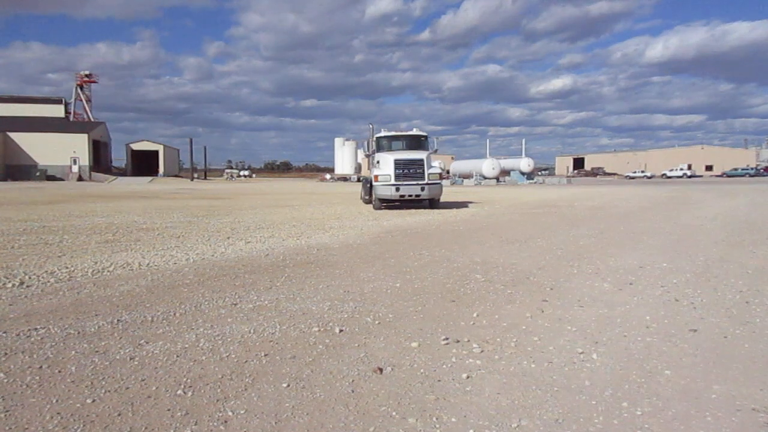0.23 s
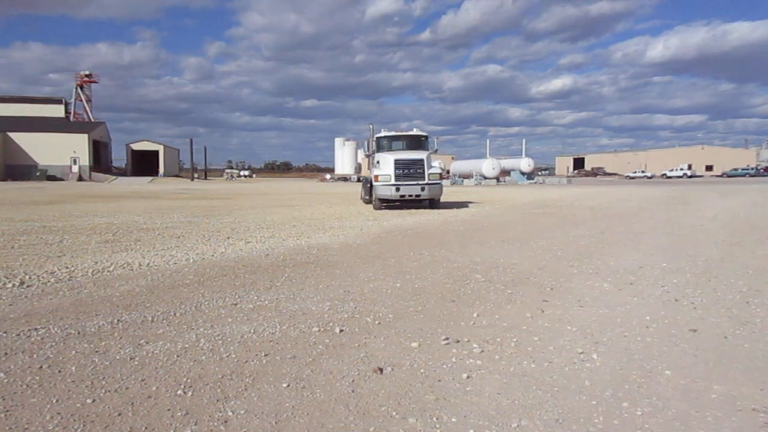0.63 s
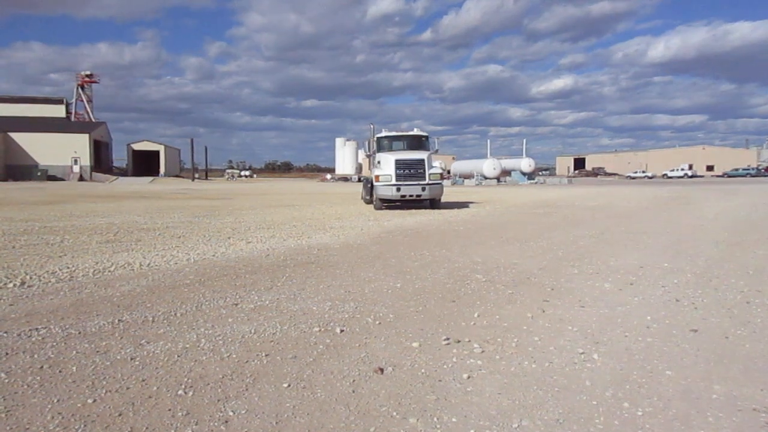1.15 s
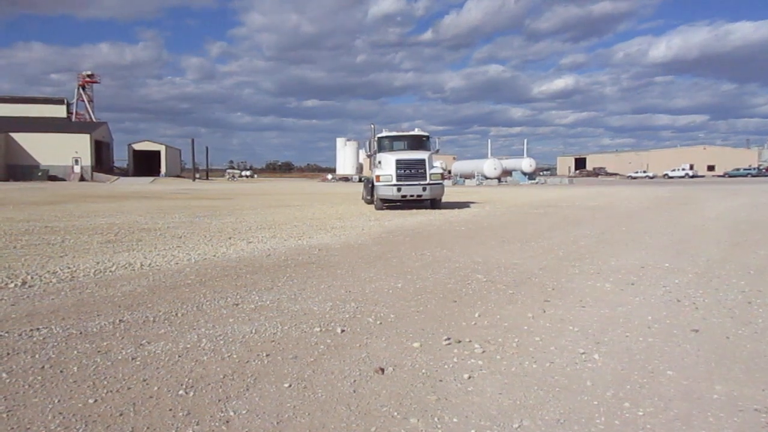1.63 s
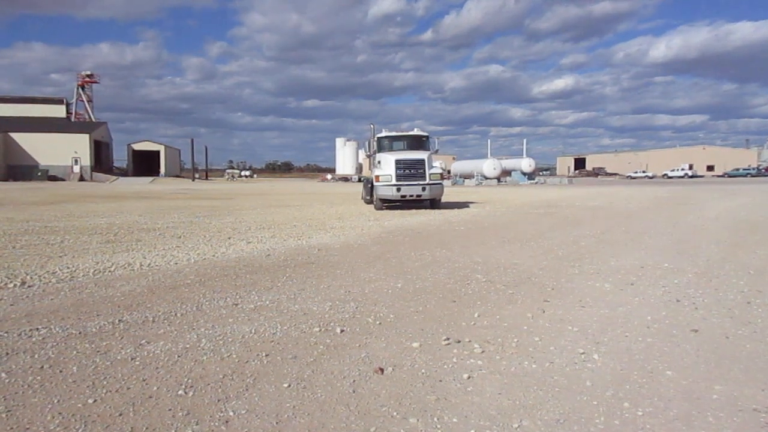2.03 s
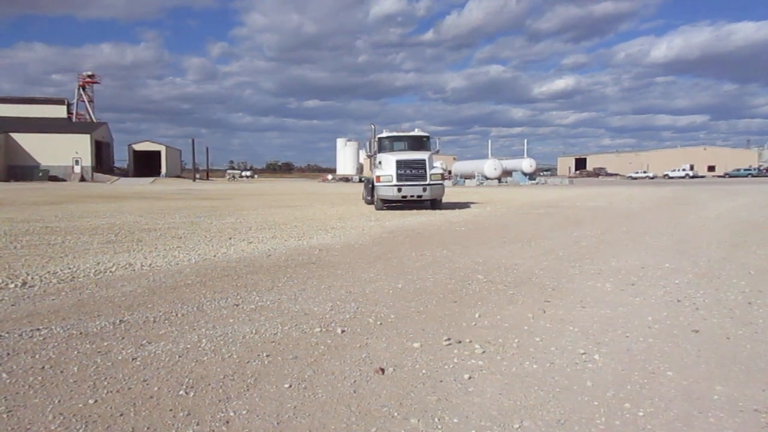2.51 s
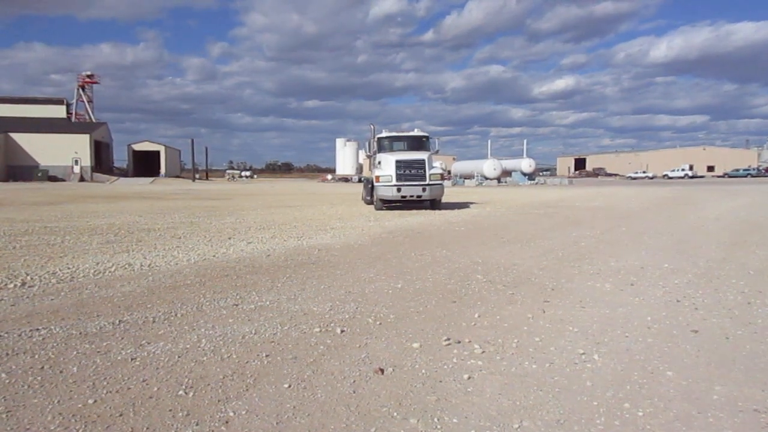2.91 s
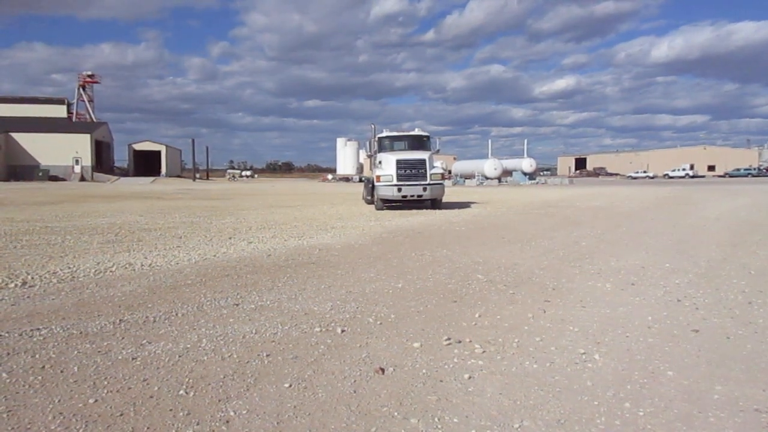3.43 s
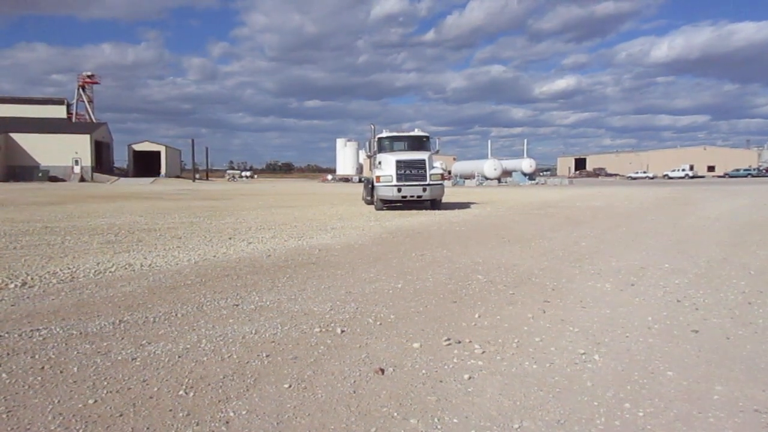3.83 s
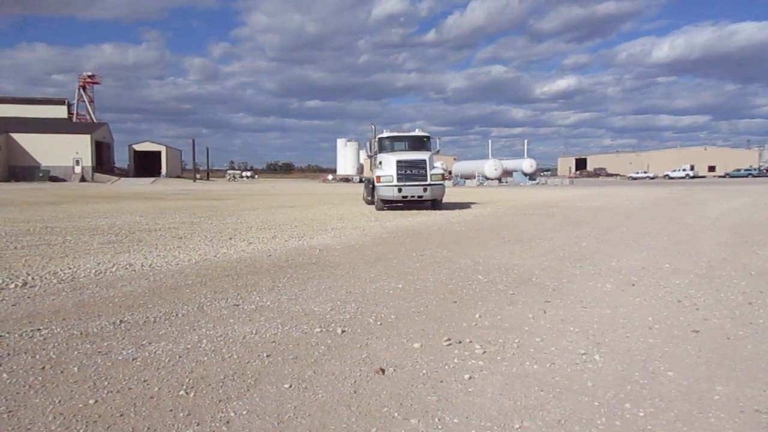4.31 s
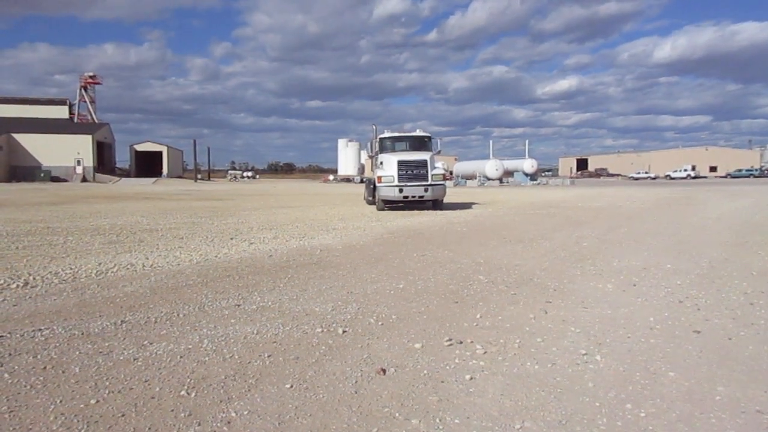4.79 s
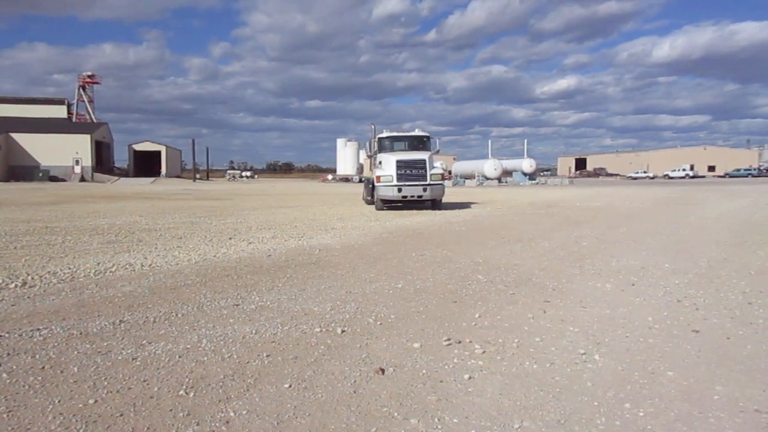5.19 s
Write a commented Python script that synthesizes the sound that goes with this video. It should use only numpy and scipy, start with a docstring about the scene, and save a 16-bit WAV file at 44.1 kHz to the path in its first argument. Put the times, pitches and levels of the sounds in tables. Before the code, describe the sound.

Wind hits a bare camera microphone in a wide, open gravel yard, with no echo. It begins abruptly at full strength: a deep, lumpy rumble, mostly low bass, covered in rapid crackles and flutter until about 0.4 s. Hard pops follow near 0.55 and 0.7 s, then another rough, crackling gust from 1.15 to 1.4 s. The wind eases around 1.5 s, flutters on, and gives a very sharp snap at 2.14 s. Shorter bursts come at 2.4 and 2.75 s, with a relative lull until 3 s. Softer thumps and flaps continue through 3.3 to 4.2 s, with another bright snap at 4.25 s. After that the crackles thin out while rumble keeps rolling, surging near 5.1 and from 5.25 to 5.4 s. The biggest swings are softly overloaded. Far below, a parked diesel truck idles evenly, a faint hiss with quick treble clatter, noticeable mainly in the lulls.

```python
"""Wind rumbles and crackles throughout: it gusts over a bare camera microphone in a wide open yard.
Big eddies are shaped noise; small ones are vortex pulses that flutter, flick the membrane and snap.
The strongest swings overload the amplifier, a soft squeeze against full scale.
Far beneath, a parked truck idles: faint noise whose treble clatters with each firing."""
import sys
import numpy as np
from scipy.fft import rfft, irfft, next_fast_len
from scipy.io import wavfile
from scipy.ndimage import uniform_filter1d, map_coordinates

SR = 44100
rng = np.random.default_rng(int(sys.argv[2]) if len(sys.argv) > 2 else 0)


def digitize_waveform(pressure):
    """Quantize a signal to 16-bit integers and store it at the path in sys.argv[1].

    Rows of a 2-D input are taken as channels; values are limited to [-1, 1].
    """
    field = np.atleast_2d(pressure).T
    bounded = np.clip(field, -1, 1)
    quanta = np.round(bounded * 32767).astype(np.int16)
    wavfile.write(sys.argv[1], SR, quanta)


N = 240515

# Gust strength, before each layer's own offsets: [t/s, rumble level/dB, small-eddy flutter level/dB]
GUSTS = [(0.0, -13.5, -25), (0.03, -23, -26.5), (0.17, -21, -33.5), (0.23, -13, -28), (0.33, -20.5, -29.5),
         (0.51, -23, -38.5), (0.55, -19.5, -36), (0.61, -17, -33.5), (0.64, -31, -41), (0.68, -20, -54),
         (0.82, -22.5, -37.5), (0.97, -31, -45.5), (1.02, -17.5, -38), (1.06, -28.5, -38.5),
         (1.18, -16, -28), (1.21, -15.5, -28.5), (1.38, -25, -46), (1.61, -24, -38), (1.64, -25, -30.5),
         (1.76, -24, -44.5), (1.81, -18, -36), (1.88, -30, -43), (1.99, -19, -34), (2.02, -20, -32.5),
         (2.15, -18, -35), (2.17, -21.5, -35), (2.37, -27, -41.5), (2.43, -23, -43), (2.52, -31, -43),
         (2.56, -19.5, -42.5), (2.66, -26, -33.5), (2.69, -23.5, -35.5), (2.99, -23.5, -41),
         (3.08, -19.5, -31), (3.34, -23, -38), (3.41, -17, -32.5), (3.54, -23, -36), (3.6, -18.5, -31.5),
         (3.67, -21, -36), (3.84, -17.5, -28.5), (3.95, -27, -34), (4.01, -17.5, -36), (4.17, -18.5, -28.5),
         (4.28, -20, -33.5), (4.31, -23, -44.5), (4.43, -26, -39), (4.52, -23, -33), (4.55, -37, -33),
         (4.6, -21, -37), (4.86, -23, -36), (4.89, -19.5, -34.5), (4.98, -23.5, -38.5), (5.07, -15.5, -47),
         (5.11, -24.5, -37), (5.19, -23, -41), (5.22, -28.5, -40), (5.25, -14, -39), (5.28, -32, -39),
         (5.36, -14.5, -35), (5.45, -28.5, -43.5)]
# Vortex knots that flick the membrane:
# [t/s, level/dB, nominal passing time/ms, length/ms, thump of the parent eddy relative to the flick/dB]
FLICKS = [(0.0183, -19.5, 0.23, 3.5, -1), (0.0233, -31, 0.38, 4, 11), (0.03, -18.5, 0.45, 3, -6),
          (0.0378, -17.5, 0.4, 3.4, -6), (0.0462, -31, 0.56, 2.8, -3), (0.053, -19.5, 0.33, 2.7, 1.5),
          (0.0605, -25.5, 0.5, 2.3, 8), (0.0615, -18.5, 0.6, 2.8, 1), (0.0666, -22.5, 0.35, 2.5, 5),
          (0.077, -36, 0.5, 2.8, 3), (0.0835, -22.5, 0.46, 4.4, 1), (0.096, -31, 0.33, 2.7, -4),
          (0.101, -27.5, 0.4, 3.6, 11), (0.112, -31, 0.37, 3.8, 9), (0.1345, -31, 0.54, 3.4, 1.5),
          (0.1542, -24, 0.34, 4.1, 6.5), (0.204, -14, 0.32, 2.3, 0.5), (0.2253, -16, 0.43, 2.1, -8),
          (0.231, -12, 0.23, 2.6, -3), (0.239, -33.5, 0.35, 4.5, 0), (0.2487, -21.5, 0.27, 5.9, 0),
          (0.2543, -19, 0.26, 4, 6), (0.2641, -18.5, 0.23, 1.5, 0.5), (0.2675, -20.5, 0.19, 2.6, 7),
          (0.277, -26, 0.38, 4.2, 3), (0.2898, -26, 0.26, 2.9, 3), (0.3337, -25.5, 0.47, 3.4, 10.5),
          (0.339, -27.5, 0.32, 4, 9), (0.3501, -20, 0.31, 2, 3), (0.3652, -27, 0.33, 3.3, 7),
          (0.377, -34.5, 0.3, 2, 2), (0.4027, -18.5, 0.33, 7.8, -8), (0.5536, -8, 0.33, 3.63, -4),
          (0.5691, -21.5, 0.27, 3.2, -2), (0.5987, -18.5, 0.35, 5.1, 6), (0.6195, -19.5, 0.31, 3.5, -2),
          (0.6682, -23.5, 0.56, 3.9, 5.5), (0.6969, -13, 0.27, 2.37, -1.5), (0.707, -29, 0.45, 3, 2),
          (0.7146, -23.5, 0.52, 5.2, -14), (0.7318, -24, 0.24, 5.2, -3), (0.7379, -19, 0.47, 2.4, 2.5),
          (0.7649, -21.5, 0.39, 4.5, -5), (0.781, -31, 0.47, 2.6, -4), (0.8101, -22.5, 0.32, 2.3, 2),
          (0.8259, -21, 0.17, 3.13, 3.5), (0.8506, -33, 0.24, 2, 10), (1.001, -36, 0.53, 7.2, 1),
          (1.013, -23.5, 0.33, 2.4, 11), (1.019, -23.5, 0.33, 4.1, 5.5), (1.038, -31.5, 0.62, 5.3, 10),
          (1.065, -30, 0.42, 2.6, 8), (1.075, -26, 0.45, 2.9, -3), (1.0806, -22, 0.29, 4.7, -9.5),
          (1.0881, -25, 0.28, 5.2, 3), (1.104, -20.5, 0.34, 3.2, 1), (1.137, -28.5, 0.38, 2.3, 10),
          (1.1581, -14.5, 0.27, 3.6, 0), (1.182, -26, 0.18, 3.3, 15), (1.2517, -13, 0.26, 3.3, -13),
          (1.259, -13, 0.24, 3.3, 0.5), (1.2677, -16, 0.41, 3.1, 0), (1.2774, -19.5, 0.2, 2.9, 8.5),
          (1.2849, -11, 0.19, 2.32, -20), (1.2926, -19.5, 0.3, 2.7, -1), (1.2966, -30, 0.3, 6.4, 8),
          (1.3029, -25, 0.26, 4, -1), (1.3228, -23.5, 0.3, 1.7, 9.5), (1.361, -34, 0.3, 4.3, 2),
          (1.374, -32, 0.42, 5, 8.5), (1.396, -22, 0.39, 3.75, 5), (1.4989, -28, 0.54, 3, 2.5),
          (1.6445, -29, 0.56, 3.4, 9.5), (1.661, -28.5, 0.41, 2.6, -1), (1.672, -24, 0.45, 3.7, 0),
          (1.7289, -21.5, 0.34, 3.3, 1.5), (1.7999, -14.5, 0.24, 3.2, 1), (1.8266, -23.5, 0.51, 3.4, -9),
          (1.832, -23, 0.48, 2.8, 3), (1.849, -30, 0.4, 3.6, -1), (1.854, -27.5, 0.47, 2.7, 5),
          (1.876, -31, 0.46, 4.9, 3), (1.914, -35, 0.58, 5.5, 20), (1.9264, -35, 0.5, 6.9, 1),
          (1.966, -31, 0.52, 6.3, 10), (1.9764, -20, 0.37, 3, 8.5), (1.9809, -28, 0.37, 2.7, 2),
          (1.985, -21.5, 0.32, 3.9, 0), (1.9962, -31.5, 0.43, 2.4, 8), (2.017, -32.5, 0.55, 5.3, -1),
          (2.0628, -35, 0.29, 3.7, 18), (2.069, -33.5, 0.41, 3.1, 14.5), (2.0914, -16, 0.23, 2.6, 4.5),
          (2.099, -24.5, 0.26, 2.4, 9), (2.1183, -33, 0.39, 2, 0), (2.1406, -17.5, 0.3, 1.1, 11),
          (2.1434, -7.5, 0.11, 1.2, 4.5), (2.1602, -33, 0.28, 3.7, 1), (2.175, -36, 0.45, 3.4, 1),
          (2.1802, -27.5, 0.57, 2.1, -11), (2.195, -23.5, 0.42, 1.8, 4), (2.1985, -31, 0.29, 2.2, 10),
          (2.2116, -28.5, 0.41, 2.7, 9), (2.2339, -30.5, 0.65, 5, 10.5), (2.292, -32.5, 0.44, 2.5, 0.5),
          (2.3794, -29.5, 0.31, 4.2, -3.5), (2.3884, -35, 0.46, 2, -1), (2.3974, -25, 0.42, 4.1, 5),
          (2.4119, -21.5, 0.29, 3.1, 2), (2.4226, -23, 0.33, 2.9, -6), (2.4262, -27.5, 0.46, 8.2, -6),
          (2.4345, -25, 0.38, 4, -1), (2.5609, -26, 0.51, 4.2, 5), (2.5677, -22.5, 0.34, 3.35, 3.5),
          (2.5819, -25, 0.52, 3.0, -2), (2.592, -36.5, 0.2, 2.0, 2), (2.6889, -32.5, 0.38, 4.4, 13.5),
          (2.7209, -23, 0.26, 4.4, 11.5), (2.73, -14.5, 0.32, 5, -7), (2.7413, -16, 0.19, 3.7, -18),
          (2.7461, -13.5, 0.2, 3.4, -0.5), (2.756, -24, 0.3, 8, 6), (2.765, -29, 0.62, 2.9, -4.5),
          (3.0077, -22, 0.32, 4.16, 1), (3.0182, -24, 0.31, 2.44, -2), (3.0874, -28, 0.26, 4.7, 1),
          (3.1094, -28, 0.57, 3, -5), (3.122, -33, 0.49, 6.6, 5), (3.1576, -28, 0.83, 4, 12),
          (3.1658, -33.5, 0.29, 2.9, 0), (3.2874, -22, 0.34, 4.2, 1), (3.2934, -16.5, 0.23, 2.96, -4.5),
          (3.409, -26, 0.42, 3.3, 7), (3.4176, -17, 0.3, 2.2, 2.5), (3.435, -37, 0.26, 5.7, 4.5),
          (3.4506, -33, 0.36, 3.8, 8), (3.5828, -36, 0.44, 2.8, 0.5), (3.6162, -38, 0.37, 2.5, 8),
          (3.6337, -42, 0.42, 2.6, 13), (3.6611, -32.5, 0.54, 4.2, 7), (3.786, -28.5, 0.41, 4.2, 13),
          (3.8156, -30, 0.37, 4.2, 12), (3.828, -31, 0.24, 2.6, 2), (3.8436, -22.5, 0.29, 3.1, 11),
          (3.8541, -32, 0.42, 2.5, 11.5), (3.871, -27, 0.57, 2.2, -1), (3.8866, -19, 0.38, 4.5, 4.5),
          (3.9202, -32, 0.47, 5.3, -3), (3.9984, -24, 0.39, 5.5, 10.5), (4.02, -26, 0.46, 4.5, 4.5),
          (4.028, -23, 0.39, 3.7, -7), (4.0527, -24.5, 0.59, 3.7, 5), (4.0745, -30, 0.48, 2.4, 1),
          (4.081, -33, 0.39, 2.8, 6), (4.0936, -28, 0.53, 2.6, 4), (4.1059, -26.5, 0.25, 4.6, 1),
          (4.132, -28.5, 0.32, 3.8, 9), (4.1426, -18.0, 0.4, 2.5, -3), (4.1641, -25.5, 0.31, 2.4, 0),
          (4.2517, -10, 0.18, 2.02, 2), (4.2552, -13, 0.29, 3, 0.5), (4.2821, -23, 0.21, 3.5, 4.5),
          (4.2867, -28, 0.29, 2.7, 6), (4.3531, -32, 0.52, 3.6, 9), (4.373, -27.5, 0.68, 2.6, -1),
          (4.44, -30, 0.44, 2.8, -9.5), (4.504, -33.5, 0.33, 3.3, 2), (4.5254, -26, 0.34, 4.5, 9),
          (4.531, -33.5, 0.35, 2.1, 5), (4.583, -36, 0.5, 5.1, 1), (4.655, -42.5, 0.39, 5.1, 21.5),
          (4.689, -25, 0.27, 2.7, 5.5), (4.699, -38, 0.54, 4.9, 12), (4.8725, -30, 0.17, 4.4, 1.5),
          (4.8929, -21, 0.37, 3.1, 11), (4.8997, -25, 0.25, 3.8, 9.5), (4.95, -34.5, 0.56, 4.4, 12.5),
          (4.9948, -32, 0.35, 3, -5), (5.028, -38, 0.46, 3.3, 13), (5.064, -26.5, 0.16, 2.64, 10.5),
          (5.1627, -36, 0.38, 5.2, 5), (5.1859, -18, 0.34, 2, 0.5), (5.2447, -32.5, 0.56, 1.8, 13.5),
          (5.356, -26.5, 0.29, 4.2, 10), (5.3643, -26.5, 0.3, 2.2, 5.5)]
# Tone of the big eddies, relative spectrum: [f/Hz, level per Hz/dB]
RUMBLE_SPECTRUM = [(20, -19.5), (40, -2), (70, 4.5), (140, 5), (250, -5), (400, -12.5), (700, -33.5),
                   (1500, -83)]
# Tone of the far engine with its resonances, relative spectrum: [f/Hz, level per Hz/dB]
ENGINE_SPECTRUM = [(300, -20.5), (650, -4.5), (860, 19), (1000, 10), (1600, 7.5), (2700, 1), (3500, -1.5),
                   (4060, 4), (4500, -8), (5100, -3.5), (5800, -11.5), (6350, -7), (6800, -19), (7900, -19),
                   (10400, -31.5), (12000, -37), (13200, -63), (16000, -70.5)]
# Thin treble snaps on some of the flicks: [t/s, level/dB]
SNAPS = [(0.598, -41.5), (0.696, -50), (0.73, -54.5), (1.157, -52), (1.798, -53), (2.1428, -26),
         (4.2514, -30), (4.281, -41), (4.8706, -61.5), (5.0624, -51)]
# Engine hiss level before its slow wobble: [t/s, level/dB]
ENGINE_LEVEL = [(0.05, -48.5), (0.87, -53.5), (1.27, -50.5), (1.45, -53.5), (2.03, -51.5), (2.39, -54.5),
                (4.03, -48.5), (4.39, -55), (5.4, -51.5)]
# Idle speed: [t/s, speed/rpm]
ENGINE_RPM = [(0, 653), (2.7, 653), (3.0, 648), (5.45, 648)]
# Clatter of each cylinder over the steady noise, before the spread of single firings: [level/dB]
CYLINDER_DB = [6.5, 3, 6.5, -1, 6.5, -1.5]

THUMP_SHARE_DB = -2  # rumble offset that leaves room for the thumps
FRAY_LAG_MS, THUMP_LAG_MS = 1.2, 0.78  # shreds and thump surround the flick, centred slightly after it
FRAY_DB, FRAY_TOP_DB = -10, -27.5  # shreds relative to their flick, and their loudest level
FRAY_MS, FRAY_SLOWER = 14.96, 1.51  # reach of the shreds; factor on the flick's passing time
CROWD_SHARE_DB = -5  # offset of every small eddy from the flutter level
CROWD_S, CROWD_DB = 0.018, 3  # reach of the stir around a flick; flutter range from calm to churned
FIRST_FIRING = 0.74  # firings already under way at the start
CLATTER_MS, CLATTER_HZ = 34, 2600  # decay of one firing; corner above which it is heard
SPAN = 1024  # samples that hold one vortex knot
TOP_HZ = 15900  # band limit of the amplifier


def rumble():
    """Large eddies roll over the microphone in lumps; the deepest are too big to follow quick gusts."""
    noise = unit(filtered(rng.standard_normal(N), lambda hz: amp(along(RUMBLE_SPECTRUM, hz))))
    deep = filtered(noise, lambda hz: 1 / (1 + (hz / 70) ** 4))
    level_db = over_time(GUSTS, 1) + THUMP_SHARE_DB
    slow_db = uniform_filter1d(level_db, size=SR // 8)
    lumpy_db = level_db + 2.1 * wobble(30)
    return deep * amp(slow_db) + (noise - deep) * amp(lumpy_db)


def flicks():
    """A strong knot rides on the slower thump of its parent eddy, which mostly pulls; dull shreds fray."""
    s, db, passing_ms, length_ms, thump_db = np.transpose(FLICKS)
    passing_ms = np.clip(passing_ms, 0.03, 1)
    length_ms = np.clip(length_ms, 0.8, 9)
    sharp = vortices(s, db, passing_ms, spread_ms=length_ms, low_hz=600, count=5, suction=0.65)
    fray_db = np.minimum(db + FRAY_DB, FRAY_TOP_DB)
    fray = vortices(s + FRAY_LAG_MS / 1000, fray_db, FRAY_SLOWER * passing_ms,
                    spread_ms=FRAY_MS, low_hz=503, count=9)
    thump = vortices(s + THUMP_LAG_MS / 1000, db + thump_db, np.full(len(s), 0.65),
                     spread_ms=6.25, low_hz=164, count=3, suction=0.75)
    return sharp + fray + thump


def flutter():
    """A crowd of weak, slow small eddies, strongest in churned air."""
    draw = rng.random((4000, 3))
    s = draw[:, 0] * N / SR
    level_db = over_time(GUSTS, 2) + CROWD_DB * (stir() - 0.5)
    local_db = level_db[(draw[:, 0] * N).astype(int)]
    # few eddies stand out, most stay near the low end
    eddy_db = local_db - 2.2 * np.log(draw[:, 1] + 0.071) + CROWD_SHARE_DB
    return vortices(s, eddy_db, 0.35 + 0.92 * draw[:, 2], spread_ms=2.88, low_hz=343.8, count=2)


def snaps():
    """A sudden kink in the pressure reaches far into the treble."""
    s, db = np.transpose(SNAPS)
    return vortices(s, db, np.full(len(s), 0.04), spread_ms=0.44, low_hz=2900, count=2)


def engine_hiss():
    """A far idling six-cylinder diesel: fan noise, and treble clatter that jumps at each firing."""
    noise = unit(filtered(rng.standard_normal(N), lambda hz: amp(along(ENGINE_SPECTRUM, hz))))
    treble = filtered(noise, lambda hz: 1 / (1 + (CLATTER_HZ / (hz + 1)) ** 4))
    firing_hz = over_time(ENGINE_RPM, 1) / 20  # three firings a turn
    firings = FIRST_FIRING + np.cumsum(firing_hz) / SR
    which = firings.astype(int)
    cylinder_db = np.array(CYLINDER_DB)[which % len(CYLINDER_DB)]
    strength_db = cylinder_db + rng.normal(0, 2, which[-1] + 1)[which]
    since_firing_ms = 1000 * (firings - which) / firing_hz
    clatter = amp(strength_db) * np.exp(-since_firing_ms / CLATTER_MS)
    beat = unit(1 + uniform_filter1d(clatter, size=200))  # softened onsets
    level_db = over_time(ENGINE_LEVEL, 1) + 1.2 * wobble(11)
    return amp(level_db) * (noise - treble + beat * treble)


def stir():
    """How churned the air is, 0-1: it rises wherever flicks crowd together."""
    t = np.arange(0, N, 64) / SR
    distance_s = t[:, None] - np.array(FLICKS)[:, 0]
    crowd = np.exp(-(distance_s / CROWD_S) ** 2).sum(axis=1)
    return np.interp(np.arange(N) / SR, t, np.tanh(crowd / 2))


def vortices(s, db, passing_ms, spread_ms, low_hz, count, suction=0.5):
    """Knots of counter-turning vortices in a line; db is a knot's power above low_hz over its spread."""
    hz = np.fft.rfftfreq(SPAN, 1 / SR)
    spread = np.reshape(spread_ms, (-1, 1)) / 1000
    draw = rng.random((len(s), 3, count))
    place = (np.arange(count) + draw[:, 0]) / count - 0.5
    lag = SPAN / 2 / SR + spread * place
    # suction is the share of knots whose core pulls the membrane outward
    turn = (-1) ** (np.arange(count) + count // 2) * np.sign(draw[:, 1, :1] - suction)
    size = turn * (0.45 + draw[:, 1]) * (1 - 2.4 * place ** 2)
    # the rim of a knot moves slower than its core
    passing = passing_ms[:, None] / 1000 * (0.78 + 2.62 * place ** 2 + 0.3 * draw[:, 2])
    # a vortex drifting past presses as 1 / (1 + (t / passing)^2): its spectrum falls exponentially
    knot = 0
    for k in range(count):
        decay = np.outer(passing[:, k] + 1j * lag[:, k], hz)
        knot = knot + size[:, k, None] * np.exp(-2 * np.pi * decay)
    knot = knot * hz ** 2 / (hz ** 2 + low_hz ** 2)
    energy = np.sum(irfft(knot * (hz > low_hz), SPAN) ** 2, axis=1, keepdims=True) + 1e-20
    wave = irfft(knot, SPAN) * amp(db)[:, None] * np.sqrt(spread * SR / energy)
    at = np.round(s * SR).astype(int)[:, None] + np.arange(SPAN)
    # overlapping knots add up, each centred on its own time
    return np.bincount(at.ravel(), wave.ravel(), N + 2 * SPAN)[SPAN // 2:][:N]


def over_time(table, column):
    """One column of a table joined by straight lines, a value per sample."""
    rows = np.array(table)
    return np.interp(np.arange(N) / SR, rows[:, 0], rows[:, column])


def wobble(rate):
    """A smooth random curve, rate knots a second."""
    knots = rng.standard_normal(int(N * rate / SR) + 4)
    return map_coordinates(knots, [np.arange(N) * rate / SR])


def filtered(x, response):
    """Shape the spectrum of x by a response of frequency, keeping N samples."""
    m = next_fast_len(N + 8192)
    return irfft(rfft(x, m) * response(np.fft.rfftfreq(m, 1 / SR)), m)[..., :N]


def along(points, hz):
    """Read a spectrum table between its points on a log frequency axis."""
    f, v = np.transpose(points)
    return np.interp(np.log(hz + 1), np.log(f + 1), v)


def amp(db):
    """Turn decibels into amplitude."""
    return 10 ** (np.asarray(db) / 20)


def unit(x):
    """Scale x to an RMS of one."""
    return x / np.sqrt(np.mean(x ** 2) + 1e-20)


def scene():
    """Wind layers and the far engine add up at the membrane, one channel."""
    return (rumble() + flutter() + flicks() + snaps() + engine_hiss())[None]


def record(dry):
    """The amplifier squeezes big swings against full scale; nothing passes above the band limit."""
    squeezed = dry / (1 + dry ** 4) ** 0.25
    # a mirrored tail keeps the end from clicking in the filter
    padded = np.pad(squeezed, [(0, 0), (0, SPAN)], "reflect", reflect_type="odd")
    return np.clip(filtered(padded, lambda hz: hz < TOP_HZ), -1, 1)


dry = scene()
out = record(dry)
digitize_waveform(out)
```